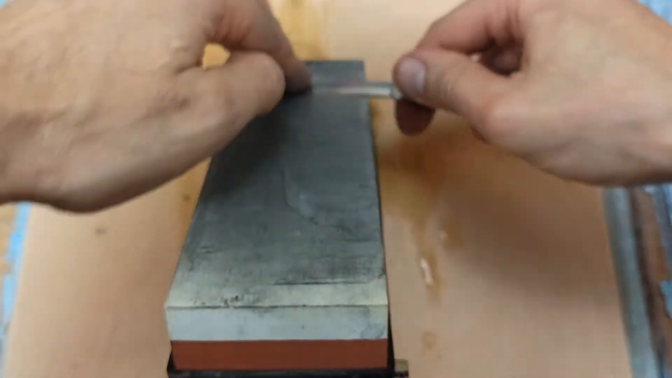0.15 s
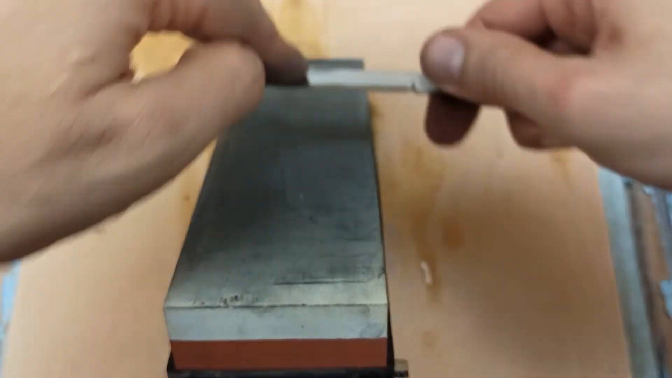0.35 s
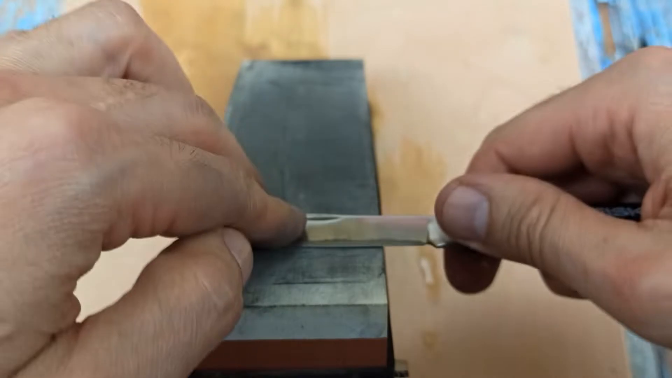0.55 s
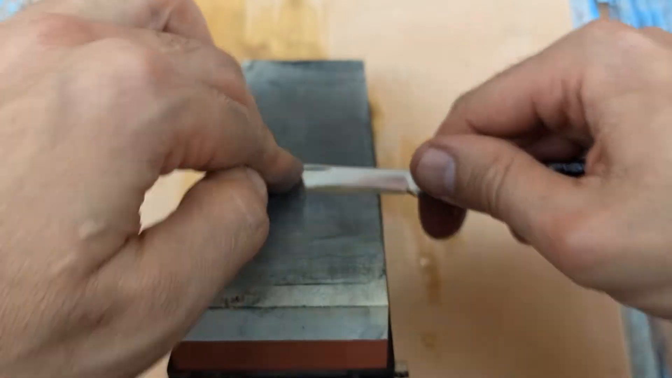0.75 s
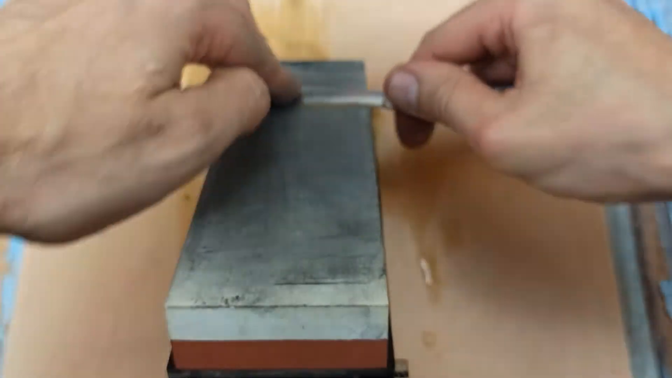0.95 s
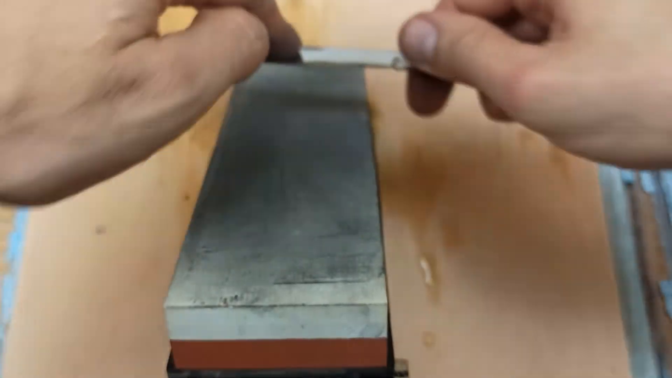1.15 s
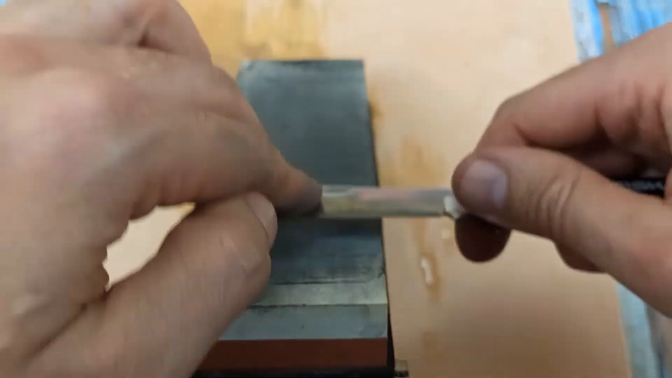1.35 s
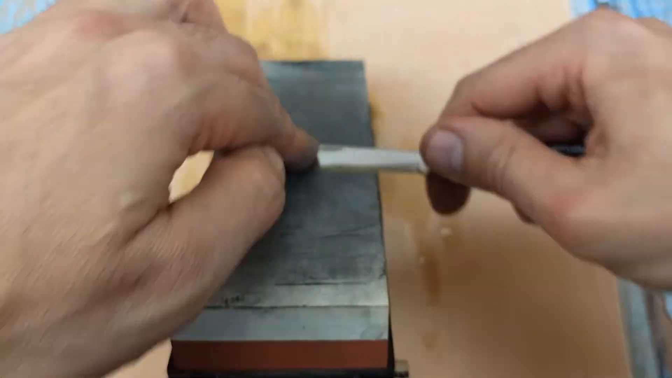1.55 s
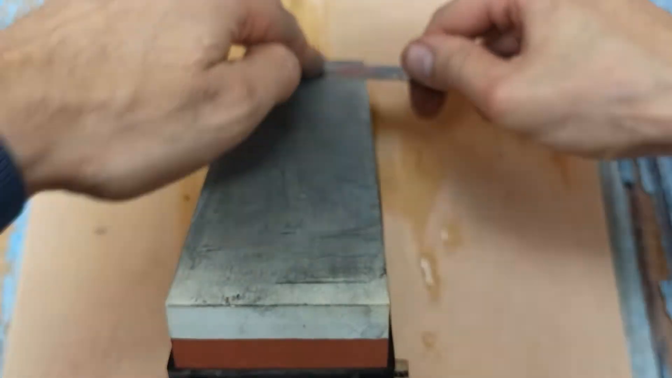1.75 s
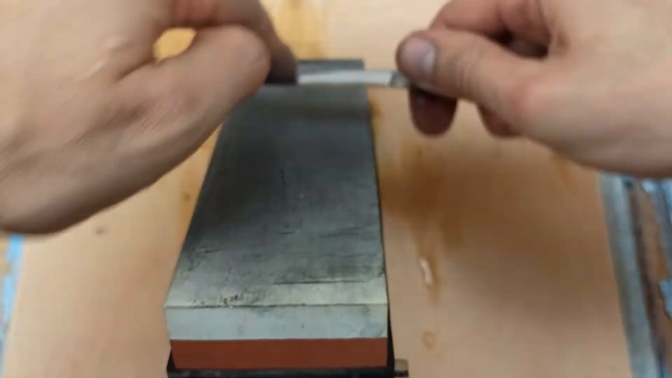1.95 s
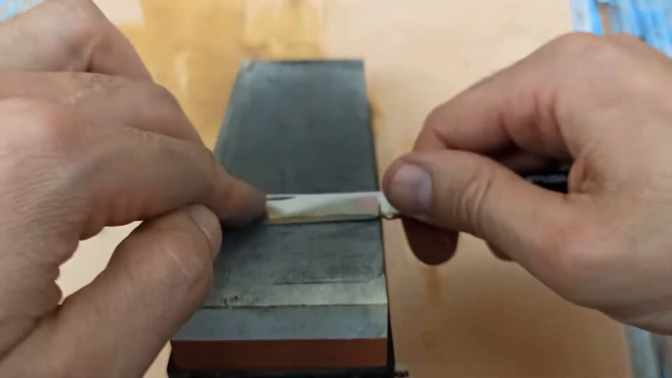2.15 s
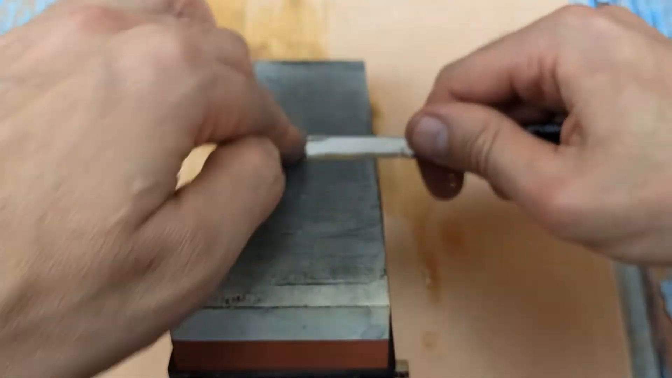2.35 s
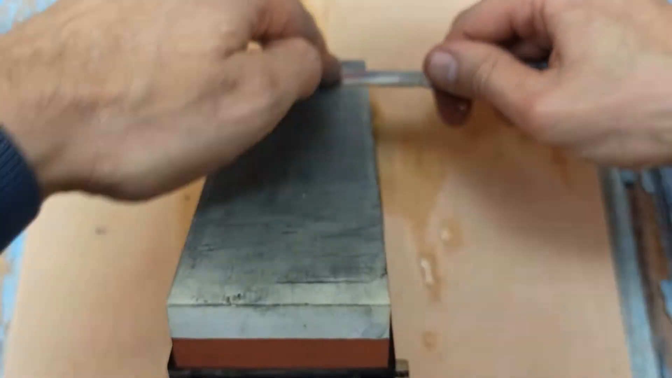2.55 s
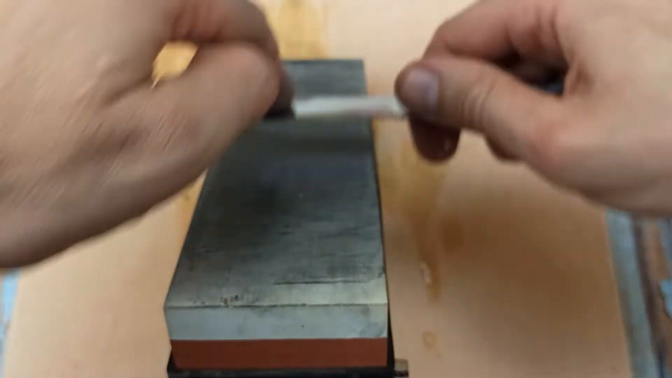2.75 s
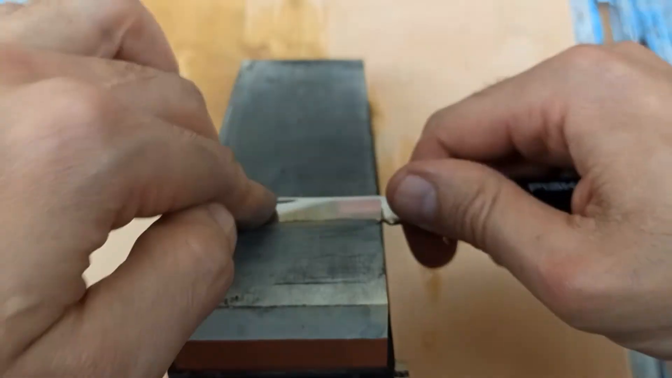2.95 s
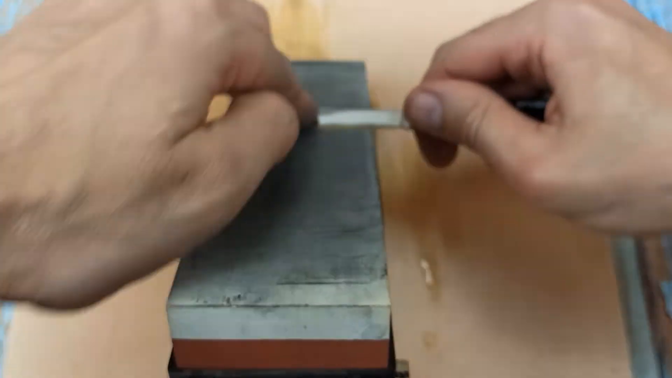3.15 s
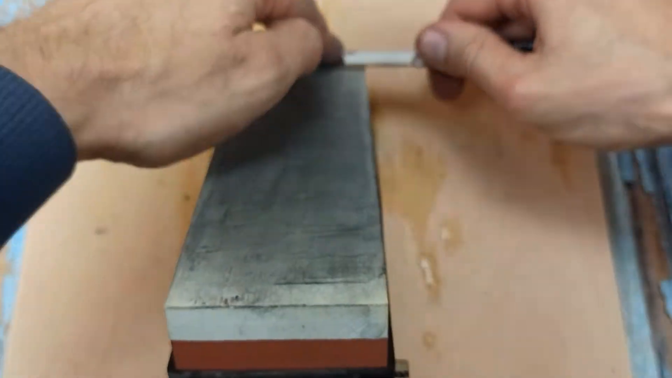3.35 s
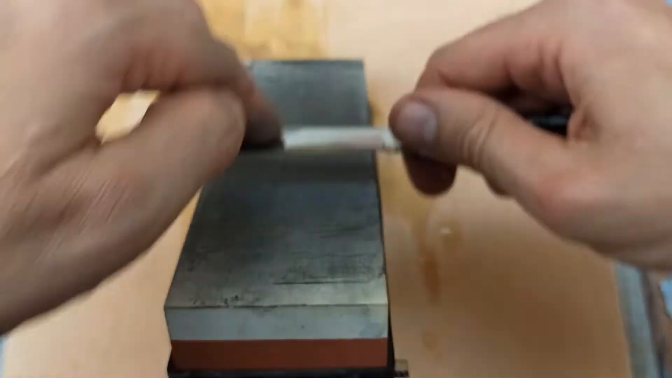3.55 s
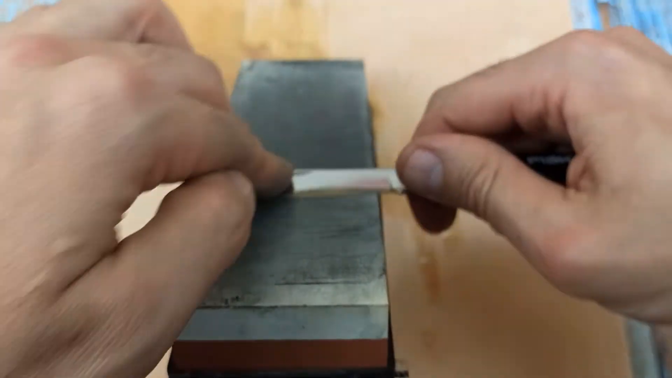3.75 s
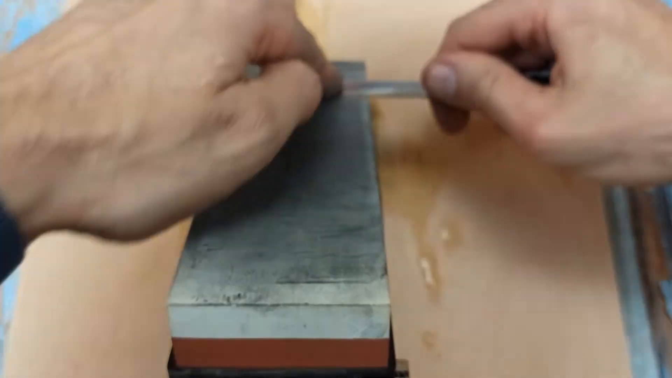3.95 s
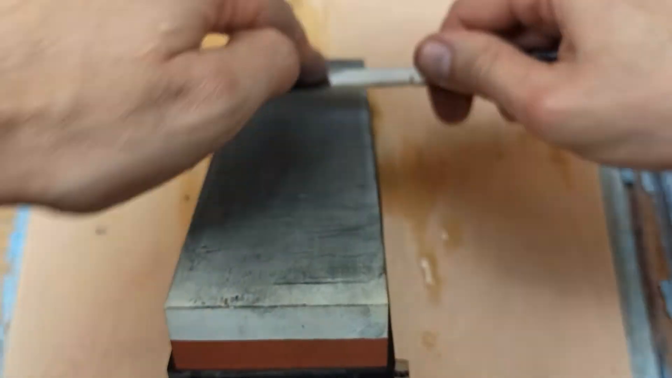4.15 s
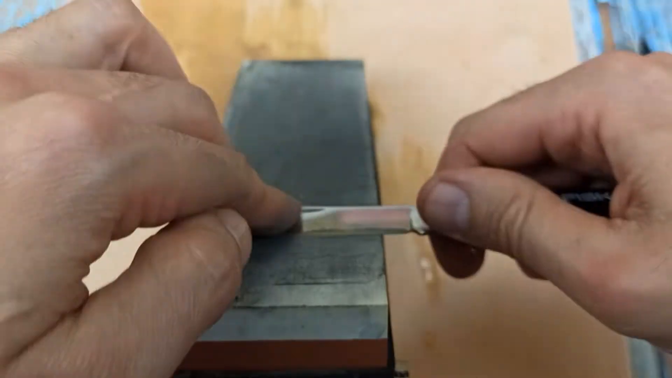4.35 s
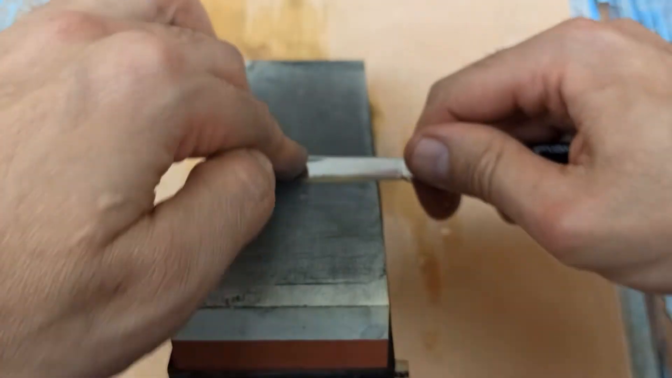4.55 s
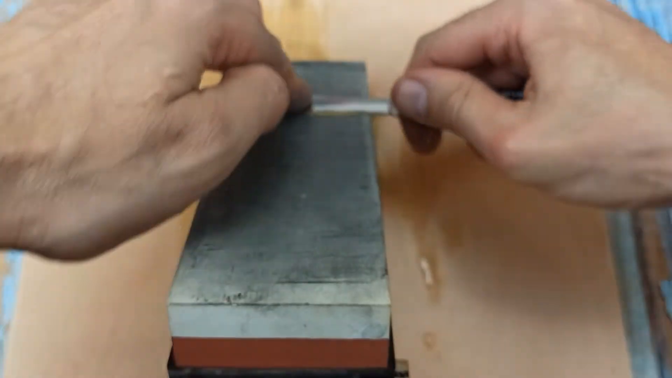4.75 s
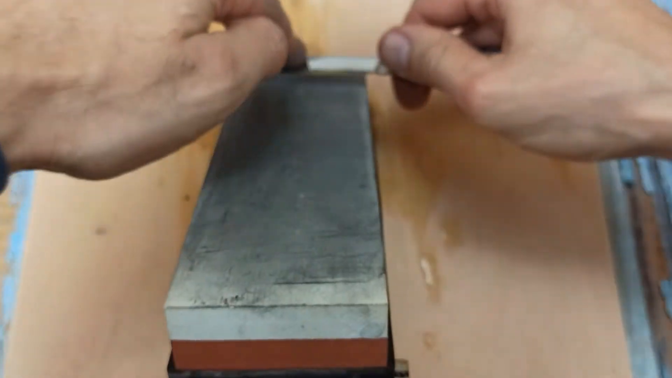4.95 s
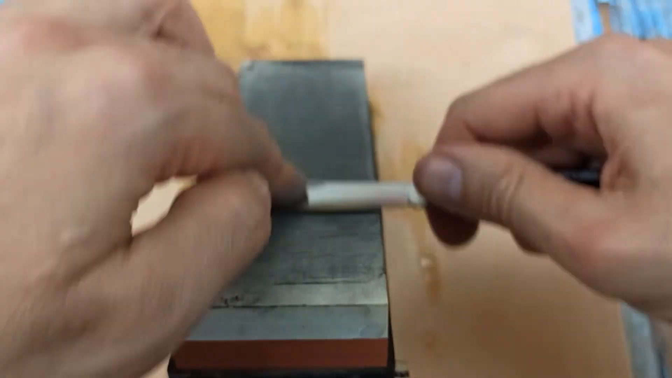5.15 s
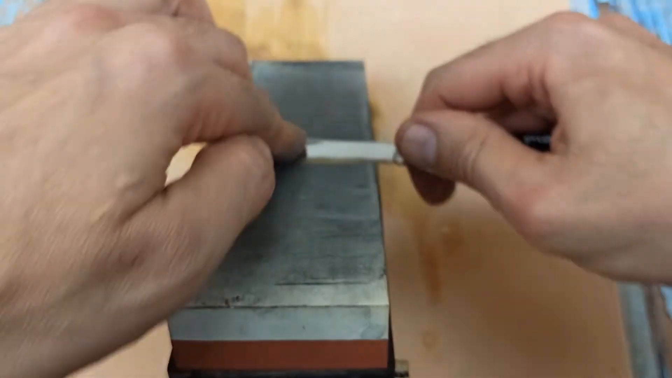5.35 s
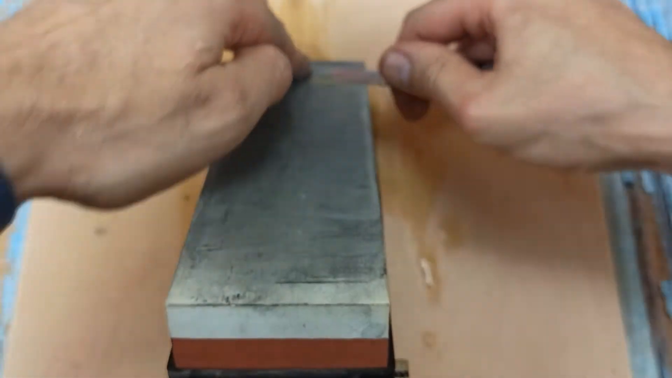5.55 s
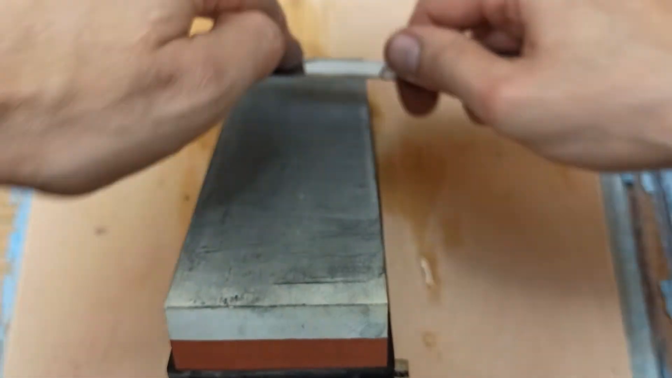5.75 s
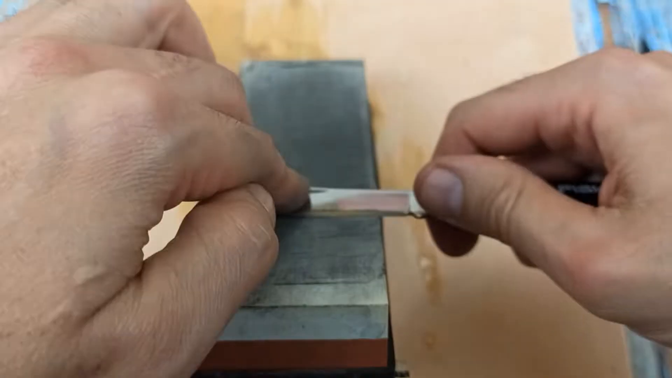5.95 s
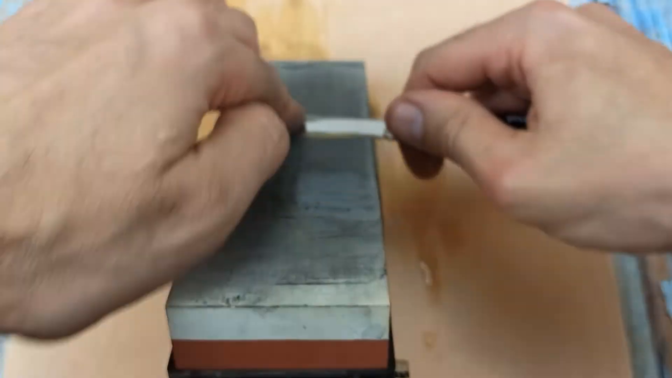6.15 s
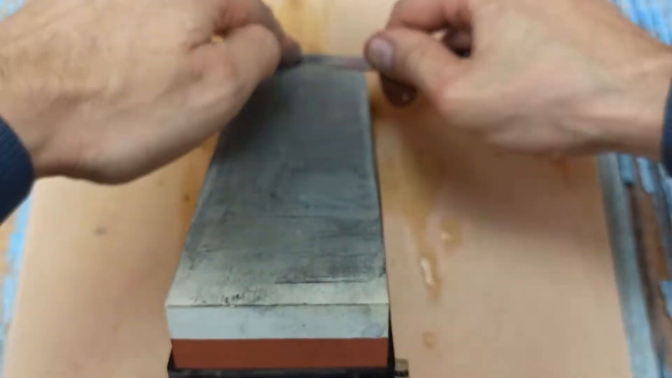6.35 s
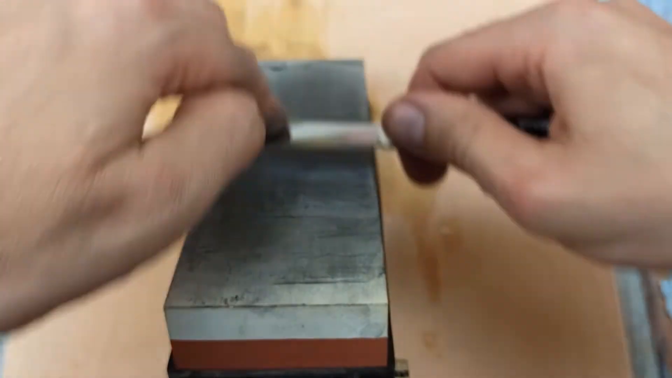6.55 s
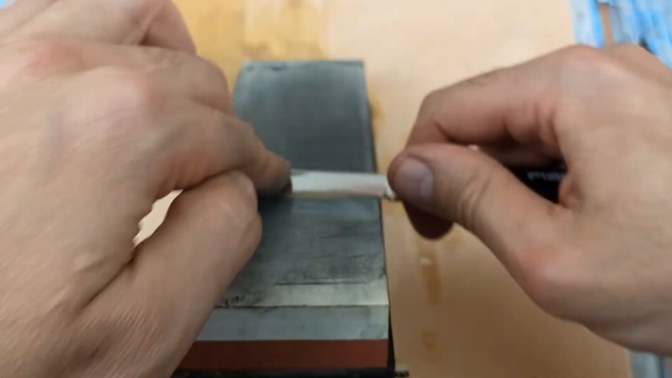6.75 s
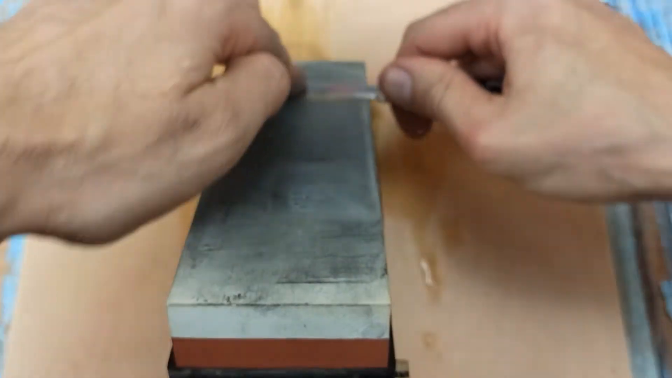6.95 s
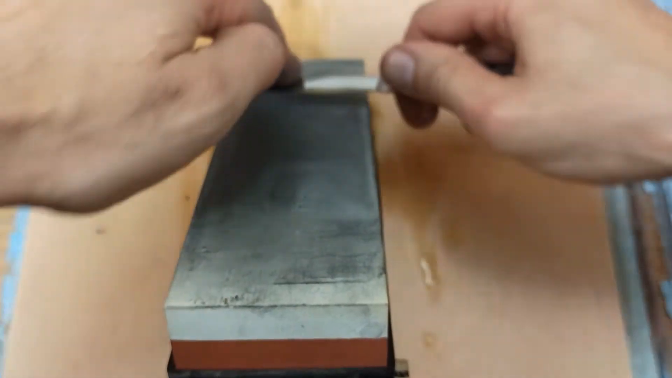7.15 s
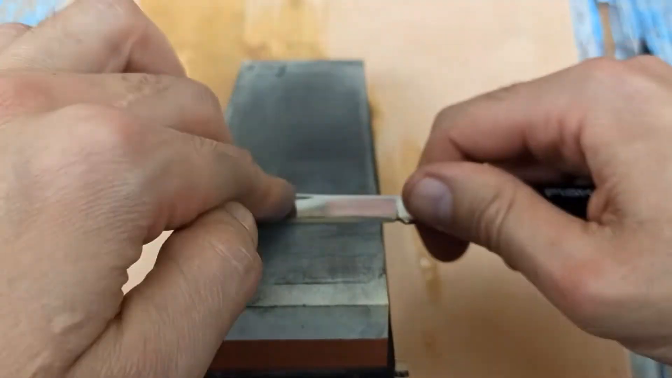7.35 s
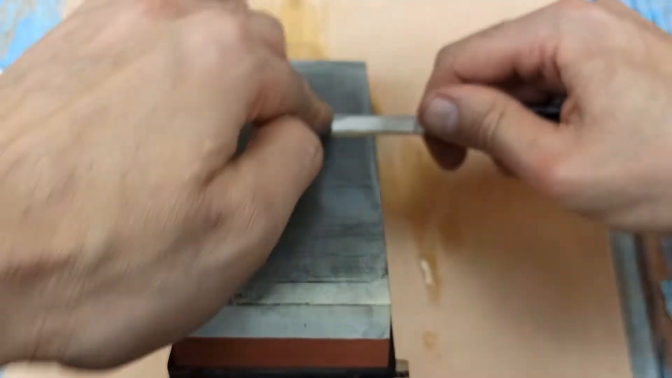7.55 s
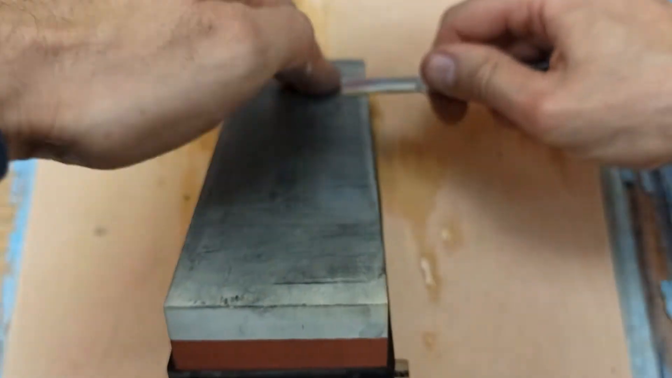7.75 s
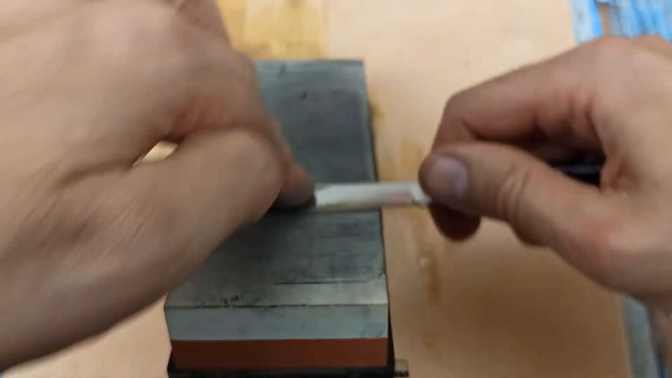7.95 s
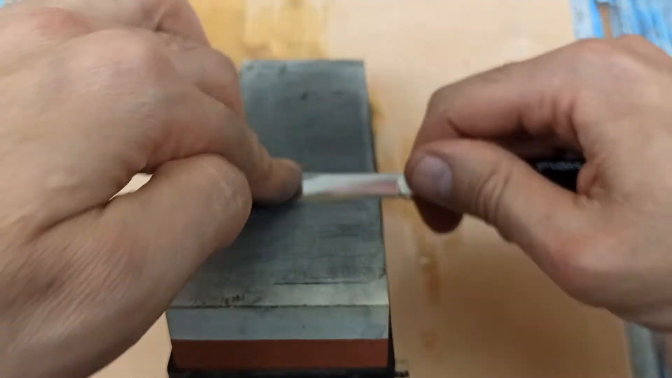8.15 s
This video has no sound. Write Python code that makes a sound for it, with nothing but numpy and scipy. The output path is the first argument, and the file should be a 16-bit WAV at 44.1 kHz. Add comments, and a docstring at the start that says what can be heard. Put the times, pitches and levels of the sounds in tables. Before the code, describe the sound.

A small steel blade is stroked by hand on a wet whetstone, bright gritty scrapes recurring steadily, each begun with a small metallic tap.

```python
"""In a quiet room, a small knife is sharpened by hand on a wet whetstone on a table, close to the microphones.
Each stroke grinds grains of grit through the blade's resonances and a fine hiss; most start with a steely tap.
Many strokes end in a scuff as the edge lifts, and a few brief squeals are unsteady sine tones.
Filtered noise makes the stone rumble and the table thrum; shaped noise is the still room and its faint hiss."""
import sys
import numpy as np
from scipy import signal
from scipy.fft import rfft, irfft
from scipy.io import wavfile
from scipy.ndimage import map_coordinates

SR = 44100
rng = np.random.default_rng(int(sys.argv[2]) if len(sys.argv) > 2 else 0)


def digitize_waveform(pressure):
    """Quantize a signal to 16-bit integers and store it at the path in sys.argv[1].

    Rows of a 2-D input are taken as channels; values are limited to [-1, 1].
    """
    field = np.atleast_2d(pressure).T
    bounded = np.clip(field, -1, 1)
    quanta = np.round(bounded * 32767).astype(np.int16)
    wavfile.write(sys.argv[1], SR, quanta)


N = 362046
TIME, FREQS = np.arange(N) / SR, np.maximum(np.arange(N // 2 + 1) * SR / N, 1)

# All levels in the tables are relative: the functions that use them trim them again.
# Steel set down on the stone. Each row: start in seconds, level in dB, settings in dB for low blade modes,
# top blade modes and stone knock, table thump in dB, left-right difference in dB.
LANDINGS = [(0.596, -21, -7, -28, -50, -50.5, -3.5), (1.4435, -19.5, -6, -43, -52, -49.5, -4.5),
            (2.1793, -19, -9.5, -28, -44.5, -54, -3.5), (2.9212, -18.5, -6.5, -34, -47, -56.5, -5.5),
            (3.695, -15.5, -10, -36, -47, -54.5, -2), (4.3274, -15.5, -11, -28.5, -46.5, -56.5, 1.5),
            (5.214, -16, -21.5, -24, -39, -57, -1), (5.9746, -22.5, -7.5, -43, -43, -58, -2),
            (6.6899, -16.5, -12.5, -34, -47, -52, 1.5), (7.3685, -16.5, -13.5, -29, -46.5, -58.5, -1.5),
            (7.972, -39, -18, -26, -42, -86, 0)]
# Colour of the crushed grit. Each row: frequency in Hz, spectrum level in dB per Hz.
GRIT_COLOUR = [(400, 10), (900, -7), (1500, 6), (2300, 10.5), (3000, 7), (5500, 10), (8500, -1.5),
               (9800, -55), (11000, -28), (16000, -9)]


def strokes():
    """How hard the passes drive edge, hiss, flexing, rumble and thrum; rumble and thrum share one crest."""
    # Passes of the blade over the stone; a crest is the share of the pass (0-1) where a sound is strongest.
    # Each row: start and end in seconds, edge ring in dB, its crest, its fade in dB by the end,
    # fine hiss in dB, its crest, blade flexing in dB, its crest, stone rumble and table thrum in dB, their crest.
    passes = [ (-0.2, 0.279, -40, .62, 15.5, -48, 0.79, -48.5, 0.48, -63.5, -59.5, 0.92),
              (0.593, 1.12, -42.5, 0.75, 5, -46, 0.5, -48.5, 0.64, -57.5, -57.5, 0.85),
              (1.432, 1.875, -46.5, 0.47, 2, -49.5, 0.5, -52.5, 0.56, -58, -53.5, 0.7),
              (2.182, 2.662, -44.5, 0.26, 5, -51, 0.39, -53, 0.23, -58, -52.5, 0.81),
              (2.942, 3.413, -45, 0.27, 3, -48, 0.27, -53, 0.27, -58, -56, 0.68),
              (3.7, 4.115, -46.5, 0.33, 6, -51.5, 0.39, -54, 0.2, -57.5, -55, 0.66),
              (4.403, 4.952, -45, 0.44, 3.5, -46, 0.48, -53.5, 0.18, -54.5, -56.5, 0.64),
              (5.229, 5.692, -43.5, 0.69, 13, -45.5, 0.34, -53.5, 0.31, -56, -52.5, 0.69),
              (5.98, 6.429, -42.5, 0.6, 11.5, -46.5, 0.59, -53.5, 0.36, -56, -52.5, 0.72),
              (6.712, 7.105, -40.5, 0.36, 12, -45.5, 0.48, -54, 0.31, -56, -56.5, 0.64),
              (7.383, 7.782, -43, 0.47, 18, -50, 0.42, -53.5, 0.31, -57, -51, .68),
              (7.809, 7.904, -48, 0.42, 18, -63, 0.32, -50.5, .75, -82, -94, .5),
              (7.967, 8.01, -51.5, .3, 8, -61, 0.35, -59.5, .3, -83, -85, 0.58),
              (8.001, 8.091, -38.5, 0.28, 18, -51, 0.48, -46, 0.37, -79, -85, 0.57),
              (8.085, 8.5, -41.5, 0.59, 9, -43.5, 0.45, -52.5, 0.46, -65, -56, 0.4)]
    attack_s, release_s = 0.0089, 0.03  # the steel meets and leaves the stone
    settle_db_per_s = 119  # stone and table come to rest after a pass
    drive = np.zeros((5, N))
    for (start, end, edge_db, edge_at, fade_db, hiss_db, hiss_at,
         flex_db, flex_at, rumble_db, thrum_db, shake_at) in passes:
        near = (TIME >= start) & (TIME < end + .5)
        t = TIME[near]
        along = (t - start) / (end - start)
        touching = np.clip(np.minimum((t - start) / attack_s, (end - t) / release_s), 0, 1)
        settling = from_db(-settle_db_per_s * np.maximum(t - end, 0))
        edge_arch = arch(along, edge_at, rise_db=11, fall_db=fade_db, bend=2.22)
        hiss_arch = arch(along, hiss_at, rise_db=19.2, fall_db=15, bend=1.52)
        flex_arch = arch(along, flex_at, rise_db=8.4, fall_db=7.5, bend=2.08)
        rumble_arch = arch(along, shake_at, rise_db=31, fall_db=12, bend=2.01)
        thrum_arch = arch(along, shake_at, rise_db=32.4, fall_db=11.7, bend=1.27)
        drive[:, near] += [touching * from_db(edge_db + edge_arch),
                           touching * from_db(hiss_db + hiss_arch),
                           touching * from_db(flex_db + flex_arch),
                           settling * from_db(rumble_db + rumble_arch),
                           settling * from_db(thrum_db + thrum_arch)]
    return drive


def grinding(edge_drive, hiss_drive, flex_drive, rumble_drive):
    """Grains drive the blade's resonances and a fine hiss; the contact flutters under the fingers."""
    grit = grains(per_s=16000, spread_db=0.5, scatter=0.77)
    edge = edge_ring(grit, edge_drive)
    flex = blade_flexing(grit, flex_drive, rumble_drive)
    hiss = slurry_hiss(hiss_drive)
    crushed = coloured(grains(per_s=5000, spread_db=1.5, scatter=0.99), GRIT_COLOUR)
    crunch = np.sqrt(edge_drive * flex_drive) * from_db(-13.5) * crushed
    flutter = from_db(1.2 * drift(hz=43.0))
    return flutter * (edge + flex + hiss * panned(db=8.0) + crunch)


def edge_ring(grit, edge_drive):
    """Grit excites the treble resonances of the edge, harder or softer for brief moments."""
    # Resonances of the edge on the stone. Each row: frequency in Hz, width in Hz, level in dB,
    # left-right difference in dB.
    edge_modes = [(5226, 990, -16.5, 6.2), (6537, 596, -6, 4.5), (6820, 204, -6, 2.8), (7500, 356, -2, 4),
                  (8253, 215, -7.5, 1.4)]
    # The edge bites harder, or skids. Each row: time in seconds, change of ring in dB, half length in seconds.
    bites = [(.212, -3, .012), (0.239, 13, 0.014), (0.656, 8, 0.015), (1.079, 8.5, 0.014),
             (1.476, 9, 0.021), (1.726, 6, 0.013), (1.79, 6.5, 0.019), (3.804, 7, 0.029), (4.752, 7, 0.088),
             (5.468, 5, 0.027), (6.226, 1, 0.011), (7.505, 7.5, 0.021), (8.2, 6, 0.016)]
    return edge_drive * swells(bites) * from_db(0.15) * wandering(grit, edge_modes, wander_db=2.0)


def blade_flexing(grit, flex_drive, rumble_drive):
    """Grit bends the pressed blade; its lowest mode partly follows the stone's shaking."""
    # Resonances of the blade pressed on the stone. Each row: frequency in Hz, width in Hz, level in dB,
    # left-right difference in dB.
    flex_modes = [(3248, 79, 2.5, -13), (3383, 420, -5.5, -6), (4135, 370, -3, -35), (4460, 570, 2.5, -1)]
    follows = 0.3  # share (0-1) of the shaking in the lowest mode's drive
    lowest_drive = flex_drive ** (1 - follows) * rumble_drive ** follows
    upper = flex_drive * from_db(0.53) * wandering(grit, flex_modes[1:], wander_db=2.5)
    lowest = lowest_drive * from_db(-8.5) * wandering(grit, flex_modes[:1], wander_db=3.5)
    return upper + lowest


def slurry_hiss(hiss_drive):
    """Dense grains in the wet slurry hiss in bands; the higher ones swell later and further."""
    # Fine hiss of the slurry. Each row: frequency in Hz, width in Hz, level in dB, lateness in seconds.
    hiss_bands = [(12136, 840, 0.5, -0.012), (13440, 1230, 2.5, -0.0059), (14500, 1420, 6.5, 0.00057)]
    # The hiss surges. Each row: time in seconds, extra level in dB, half length in seconds.
    surges = [(1.47, 11, 0.024), (1.63, 2.5, 0.021), (2.355, 2, 0.019), (3.8, 10.5, 0.048),
              (4.495, 12, 0.045), (7.543, 7, 0.011)]
    centre_hz = 13700
    brightening = 0.15  # extra dB per dB of hiss, at 2 kHz above the centre
    hiss, surging = 0, hiss_drive * swells(surges) * from_db(0.8 * drift(hz=14))
    for hz, width, db, late in hiss_bands:
        slurry = rms_one(band(grains(per_s=30000, spread_db=4.0, scatter=0.6), hz, width, order=4))
        drive = np.interp(TIME - late, TIME, surging)
        brighter = (rms_one(drive) / 2 + 1e-3) ** (brightening * (hz - centre_hz) / 2000)
        hiss += drive * brighter * from_db(db - 5.0) * slurry
    return hiss


def taps(size=2048):
    """The landing blade is quickly damped by the fingers; each blow meets it at a new spot."""
    # Resonances of the blade as it lands. Each row: frequency in Hz, width in Hz, level in dB,
    # left-right difference in dB.
    landing_modes = [(1830, 550, -23, 5.5), (2785, 1070, -19, 3), (4160, 645, -1, -2),
                     (6040, 1320, -9.5, 29), (6310, 290, 0.5, 26), (7315, 780, 7.5, 2.5),
                     (7900, 500, -32, 2.5), (12500, 1850, -13, 4), (14500, 3400, -10.5, 9)]
    out, blow = np.zeros((2, N)), signal.unit_impulse(size)
    for s, db, low_db, top_db, knock_db, thump_db, pan_db in LANDINGS:
        modes = np.array(landing_modes, float)
        modes[:, 0] *= 1 + 0.0076 * rng.standard_normal(len(modes))
        low_tilt_db, top_tilt_db = 0.93 * (low_db + 14.5), 0.7 * (top_db + 27.5)
        tilt_db = np.interp(modes[:, 0], [4450, 5900, 9000, 12000], [low_tilt_db, 0, 0, top_tilt_db])
        modes[:, 2] += tilt_db + 1.8 * rng.standard_normal(len(modes))
        steel = rms_one(ring(blow, modes))
        stone = from_db(knock_db + 15.5) * rms_one(band(blow, hz=1053, width_hz=630))
        at = int((s + 0.00091) * SR)  # just after the table thump begins
        out[:, at:at + size] += from_db(db - 17.0) * panned(pan_db - 0.5) * (steel + stone)
    return out


def scuffs():
    """The lifting edge digs in, flexes the blade and lets go at once."""
    # The edge catches as it lifts. Each row: time in seconds, level in dB, swell time constant in seconds.
    catches = [(1.889, -55, 0.0031), (2.634, -59, .008), (4.123, -59, .008), (4.967, -60.5, 0.017),
               (5.655, -51, 0.03), (5.714, -52, 0.01), (6.454, -47.5, 0.009), (7.151, -48.5, 0.012),
               (7.887, -57, 0.02)]
    # Resonances of the blade as it lifts. Each row: frequency in Hz, width in Hz, level in dB,
    # left-right difference in dB.
    lifting_modes = [(2240, 200, -9.5, -29), (3140, 410, -9, -4), (4290, 650, 1, -5.5),
                     (5350, 320, -11.5, 7), (6490, 620, 3, 3), (7330, 330, 4, 3.5), (7960, 1100, -4, 1),
                     (14000, 3300, -8, 0)]
    release_s = 0.0049
    force = np.zeros(N)
    for s, db, swell_s in catches:
        force += from_db(db) * np.exp(np.minimum((TIME - s) / swell_s, (s - TIME) / release_s))
    grit = grains(per_s=3100, spread_db=-1.0, scatter=1.0)
    steel = rms_one(ring(grit, lifting_modes))
    return force * from_db(10.5) * (steel + from_db(-19) * coloured(grit, GRIT_COLOUR))


def squeals():
    """For a moment the friction locks on to one blade mode, with an unsteady pitch."""
    # Brief stick-slip squeals. Each row: time in seconds, level in dB, frequency in Hz.
    locked_tones = [(.24, -55, 7370), (1.092, -56, 7100), (7.49, -35, 7230), (7.507, -31, 7550),
                    (7.535, -42, 7500)]
    waver = 2 * np.pi * np.cumsum(50 * drift(hz=156)) / SR  # pitch spread 50 Hz
    half_s = 0.011  # time from the peak to 6 dB below it
    tones = np.zeros(N)
    for s, db, hz in locked_tones:
        level = from_db(db - 6 * ((TIME - s) / half_s) ** 2)
        tones += level * np.sin(2 * np.pi * hz * TIME + waver)
    return panned(db=2.0) * tones


def support(rumble_drive, thrum_drive):
    """The table thumps at each landing and thrums under strokes; the stone rumbles and rocks on its base."""
    # Colour of the stone's rumble. Each row: frequency in Hz, spectrum level in dB per Hz.
    rumble_colour = [(40, -28), (85, -8), (125, -3), (165, -0.5), (240, -5.5), (300, -2), (420, -14),
                     (800, -16.5), (1400, -27.5), (3000, -19), (8000, -59)]
    # The stone shifts on its base between passes: time in seconds, rumble in dB, half length in seconds.
    nudge_s, nudge_db, half_s = (2.87, -59.5, 0.024)
    table_hz, table_t60_s, shake_t60_s = 101.2, 0.61, 0.2
    sway = signal.hilbert(band(rng.standard_normal(N), table_hz, width_hz=15.5))
    evened = rms_one(sway.real / np.abs(sway) ** 0.35)  # friction evens out the swing
    thrum = thrum_drive * from_db(3.5) * evened
    nudged = rumble_drive + from_db(nudge_db) * bump(nudge_s, half_s)
    rumble = nudged * from_db(-1.5 + 2.1 * drift(hz=25))
    for s, db, *colour, thump_db, pan_db in LANDINGS:
        age = np.maximum(TIME - s, 0)
        thrum += from_db(thump_db + 6.0 - 60 * age / table_t60_s) * np.sin(2 * np.pi * table_hz * age)
        rumble += (age > 0) * from_db(db - 42 - 60 * age / shake_t60_s)
    rocking = from_db(-0.5) * rms_one(band(rng.standard_normal(N), hz=159.6, width_hz=32))
    table = signal.sosfilt(signal.butter(2, 55, "high", fs=SR, output="sos"), thrum)
    return table + rumble * (diffuse(rumble_colour) + rocking)


def reflections(x, t60, level_db, gap_s):
    """Dense echoes that die away, different on each side."""
    age = TIME[:SR // 2]
    echoes = rng.standard_normal((2, len(age))) * from_db(-60 * age / t60) * (age > gap_s)
    echoes /= np.sqrt(np.sum(echoes ** 2, axis=1, keepdims=True))
    dull = signal.sosfilt(signal.butter(1, 9000, fs=SR, output="sos"), echoes)
    return from_db(level_db) * signal.fftconvolve(x, dull, axes=1)[:, :N]


def quiet_room():
    """Steady stereo noise: the still room, and a faint hiss above it."""
    # Still room. Each row: frequency in Hz, spectrum level in dB per Hz.
    room_colour = [(24, -39.5), (40, -24.5), (75, -3.5), (200, -6.5), (292, -9), (493, -12.5), (612, -14.5),
                   (733, -15), (1680, -22.5), (3000, -27), (3900, -55), (6600, -120)]
    # Faint steady hiss. Each row: frequency in Hz, spectrum level in dB per Hz.
    air_colour = [(1760, -40), (3000, -8.5), (3730, -1.5), (5400, -11), (6710, -2.5), (8580, -11),
                  (9400, -22), (11100, -17.5), (12000, -12), (14200, -5), (16000, -12)]
    return from_db(-64.5) * diffuse(room_colour) + from_db(-71.5) * diffuse(air_colour)


def from_db(db):
    """Decibels to gain."""
    return 10 ** (np.asarray(db) / 20)


def rms_one(x):
    """Scale to unit power."""
    return x / np.sqrt(np.mean(x ** 2) + 1e-20)


def panned(db):
    """Left and right gains for a level difference (positive: left), at constant power."""
    return rms_one(from_db(np.array([[db], [-db]]) / 2))


def arch(along, crest, rise_db, fall_db, bend):
    """Level in dB along a pass: it climbs to a crest and sinks again (bend 1 pointed, 2 round)."""
    crest = np.clip(crest, .05, .95)
    before, after = np.clip([1 - along / crest, (along - crest) / (1 - crest)], 0, 1) ** bend
    return -rise_db * before - fall_db * after


def bump(s, half_s):
    """A brief bell-shaped swell of height 1."""
    return np.exp(-np.minimum(((TIME - s) / half_s) ** 2, 20))


def swells(rows):
    """Gain that rises, or dips, briefly at each listed moment."""
    return from_db(sum(db * bump(s, half_s) for s, db, half_s in rows))


def drift(hz, size=16384):
    """Slow chance with spread 1."""
    slow = irfft(rfft(rng.standard_normal(size)) / (1 + (FREQS[:size // 2 + 1] / hz) ** 2))
    return rms_one(np.interp(TIME, np.linspace(0, TIME[-1], size), slow))


def grains(per_s, spread_db, scatter):
    """Tiny impacts of abrasive grains; the hands scatter a part differently to each side."""
    hits = rng.random(N) < per_s / SR
    sizes = from_db(spread_db * np.minimum(rng.exponential(1, N), 4)) * hits
    return rms_one(sizes * (rng.standard_normal(N) + scatter * rng.standard_normal((2, N))))


def band(x, hz, width_hz, order=2):
    """A flat-topped resonance, as of a cluster of damped modes."""
    edges = [max(hz - width_hz / 2, 10), min(hz + width_hz / 2, SR / 2 - 100)]
    return signal.sosfilt(signal.butter(order, edges, "band", fs=SR, output="sos"), x + 1e-18)


def ring(x, modes):
    """Parallel resonances of alternating sign, each radiating to its own side."""
    total = 0
    for k, (hz, width, db, pan_db) in enumerate(modes):
        total = total + from_db(db) * panned(pan_db) * band(x, hz, width) * (-1) ** k
    return total


def wandering(x, modes, wander_db):
    """Resonances swell and fade as the point of contact travels along the edge."""
    return rms_one(sum(ring(x, [mode]) * from_db(wander_db * drift(hz=9.4)) for mode in modes))


def at_hz(points):
    """A spectrum table read at every frequency."""
    hz, value = np.transpose(points)
    return np.interp(np.log(FREQS), np.log(hz), value)


def coloured(x, spectrum):
    """Give a steady sound a broad colour; unit power."""
    return rms_one(irfft(rfft(x) * from_db(at_hz(spectrum)), N))


def diffuse(spectrum):
    """Coloured stereo noise, most alike on both sides in the bass."""
    # Left-right likeness. Each row: frequency in Hz, likeness (0 independent, 1 the same).
    likeness = [(60, 0.57), (130, 0.29), (290, 0.43), (640, 0.072), (1400, 0.036), (16000, 0.1)]
    mid, side = rfft(rng.standard_normal((2, N)))
    alike = at_hz(likeness)
    stereo = irfft(np.sqrt(1 + alike) * mid + np.sqrt(1 - alike) * side * [[1], [-1]], N)
    return coloured(stereo, spectrum)


def scene():
    """The knife, a little to the left, with echoes from hands and table, then from the room."""
    edge, hiss, flex, rumble, thrum = strokes()
    landings = taps()
    sliding = grinding(edge, hiss, flex, rumble) + scuffs() + squeals()
    left, right = landings + sliding
    lag_s = 0.0002433 * (1 + 0.12 * drift(hz=2.3))  # the path difference changes as the blade travels
    knife = np.array([left, map_coordinates(right, [(TIME - lag_s) * SR], order=3)])
    near = reflections(landings, t60=0.03, level_db=-9, gap_s=0.0013)
    room = reflections(knife, t60=0.23, level_db=-16, gap_s=0.0045)
    return knife + near + room + support(rumble, thrum) + quiet_room()


def record(dry):
    """The top is cut steeply above 16 kHz."""
    return signal.sosfilt(signal.ellip(10, .1, 80, 16000, fs=SR, output="sos"), dry)


dry = scene()
out = record(dry)
digitize_waveform(out)
```